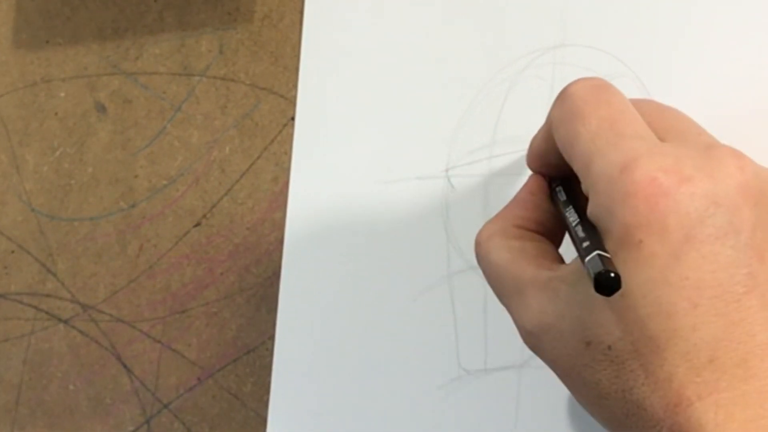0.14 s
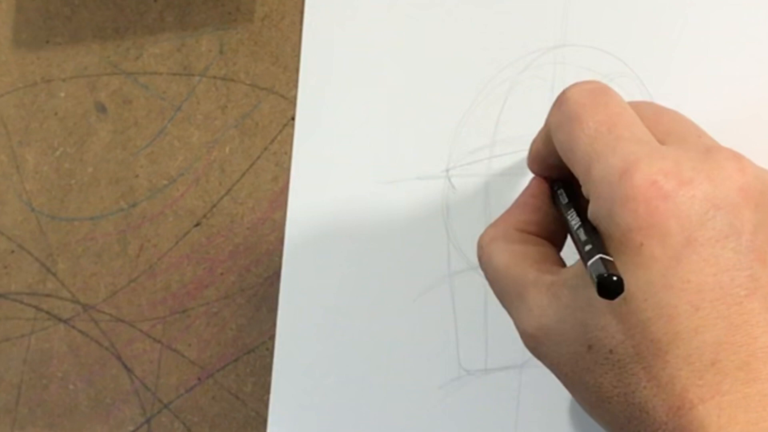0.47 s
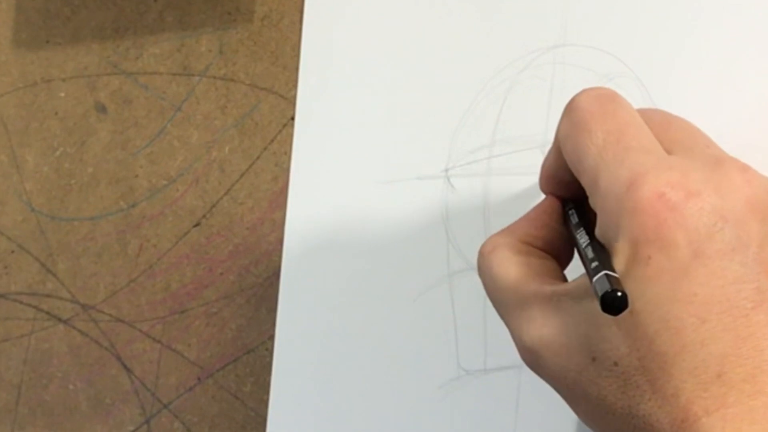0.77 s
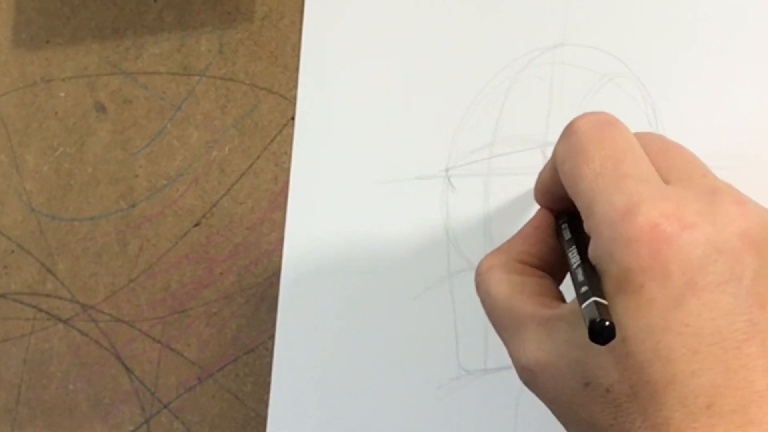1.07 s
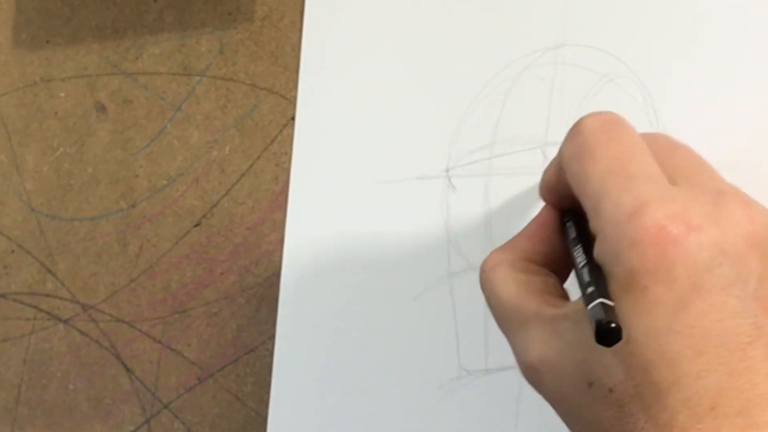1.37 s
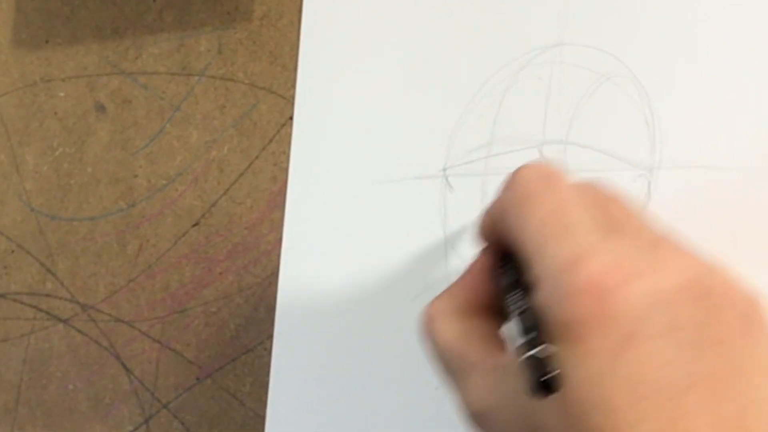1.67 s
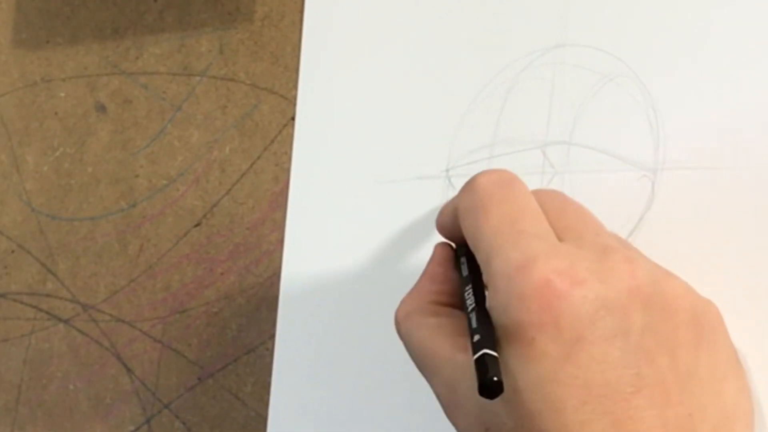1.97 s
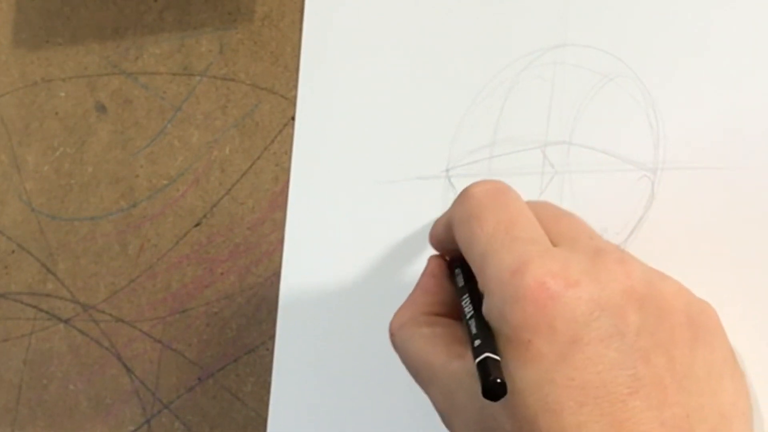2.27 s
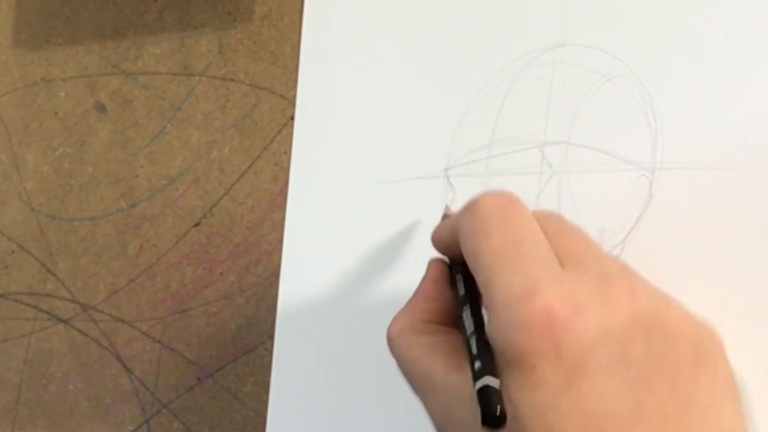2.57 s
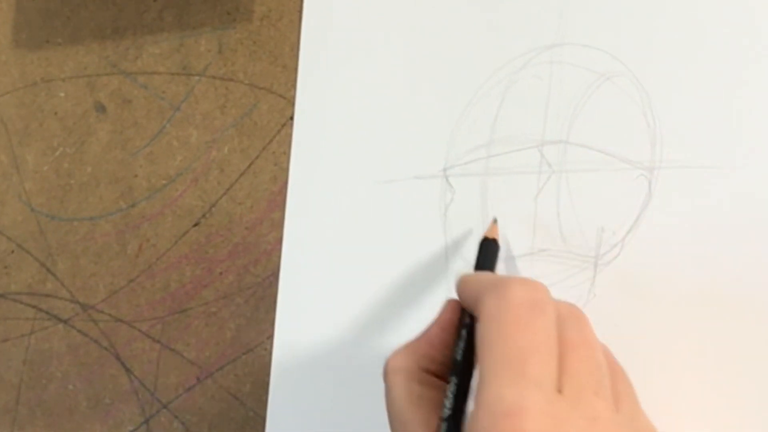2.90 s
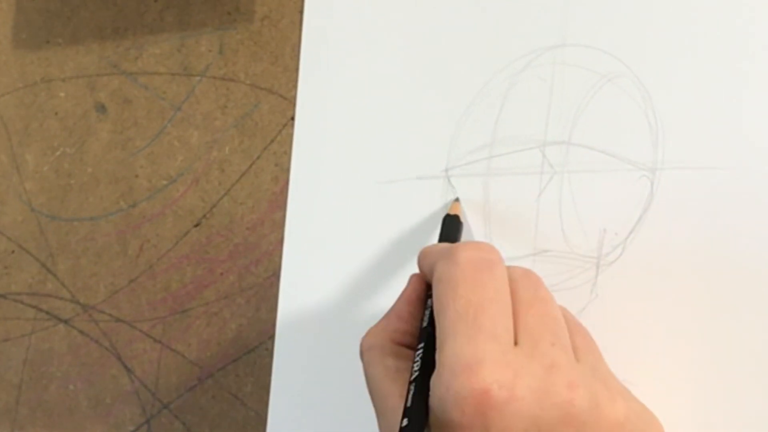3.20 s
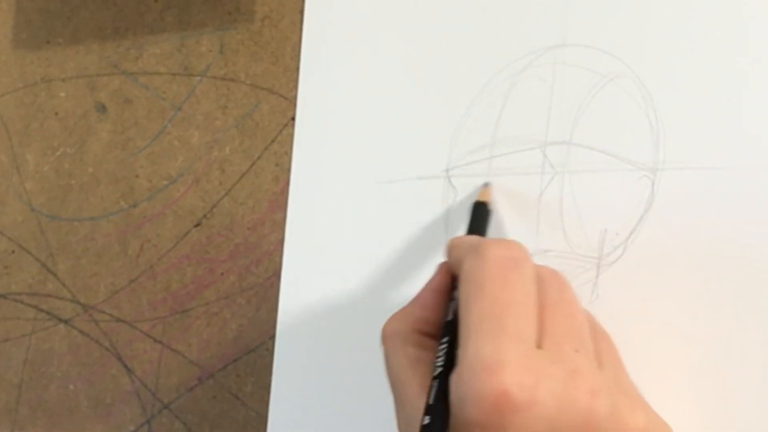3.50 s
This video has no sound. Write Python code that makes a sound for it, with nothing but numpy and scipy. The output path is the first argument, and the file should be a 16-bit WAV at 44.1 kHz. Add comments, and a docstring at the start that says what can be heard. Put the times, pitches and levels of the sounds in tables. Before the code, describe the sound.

A pencil scratches lightly on paper over a wooden board, close up in a quiet, faintly rumbling room. Soft opening strokes end with a bump at 0.6 seconds. Three quick, stronger strokes follow from 1.1 to 1.5, then a hand slides over the sheet. More short strokes come around 2 to 2.4, the hand slides again until 3, and two longer strokes start at 3.3, with occasional tiny ticks.

```python
"""Short, dry pencil strokes on a sheet of paper, close to one microphone in a quiet room.
The lead catches on the paper's tooth: the catches drum on the wooden board under the sheet
and ring the pencil high up. Between groups of strokes the hand slides over the paper.
A few tiny ticks and soft bumps come from the same spot; a low room rumble lies under it all."""
import sys
import numpy as np
from scipy import signal
from scipy.fft import rfft, irfft
from scipy.io import wavfile
from scipy.ndimage import uniform_filter1d

SR = 44100
rng = np.random.default_rng(int(sys.argv[2]) if len(sys.argv) > 2 else 0)


def unload_audio(sound):
    """Save the sound as a 16-bit wav file, at the path given as the first command line argument."""
    columns = np.transpose(np.atleast_2d(sound))
    # keep every value between -1 and 1, then stretch to whole-number steps
    steps = np.round(np.clip(columns, -1, 1) * 32767)
    wavfile.write(sys.argv[1], SR, steps.astype(np.int16))


N = 160965

# Pencil strokes, close up. Each row: start in seconds, length in seconds, fastest point as a share
# of the length, board level in dB, board tilt in dB per octave, pencil level in dB, grip.
PENCIL_STROKES = [ (0.048, 0.28, 0.49, -72, 3.5, -69.5, "damped"),
                  (0.279, 0.22, 0.086, -60.5, -2.5, -69, "damped"),
                  (0.450, 0.21, 0.22, -66.5, 0, -66.5, "damped"), (0.960, 0.17, 0.28, -75, 3, -73, "firm"),
                  (1.079, 0.15, .45, -53, -0.5, -60, "firm"), (1.208, 0.15, 0.28, -53, -1.5, -63.5, "firm"),
                  (1.337, 0.12, 0.41, -55.5, 0, -62.5, "firm"), (1.927, .110, 0.46, -85, -5, -81, "light"),
                  (2.060, 0.14, 0.34, -57.5, -1, -60, "light"), (2.19, 0.11, .55, -62, -1, -66, "light"),
                  (2.307, 0.084, .48, -56, -0.5, -60, "light"),
                  (2.383, 0.06, 0.31, -68.5, -5, -73, "light"), (3.335, 0.19, .38, -52.5, -1, -62, "long"),
                  (3.513, 0.27, 0.21, -60, -6.5, -71, "long"), ]
# Ringing of the pencil in each grip, and of the board under the sheet.
# Each row: frequency in Hz, width in Hz, relative level in dB.
GRIP_MODES = { "damped": [(1216, 180, 9), (3250, 290, -0.5), (9770, 550, 1.5), (13160, 580, 4.5)],
              "firm": [(930, 51, 6.5), (6200, 430, -12), (9450, 200, 2.5), (13150, 770, -5.5)],
              "light": [(596, 47, 3), (1790, 470, -21), (5860, 310, -11), (9370, 230, 7),
              (13060, 540, -1.5)], "long": [(3330, 590, -16), (5900, 240, -6), (9470, 350, 2.5),
              (12900, 750, -7)], }
WOOD_MODES = [(174, 44, -8), (257.6, 30, 2.5), (282, 9.3, -0.5), (440.4, 42, 1), (500, 34, -7),
              (610, 36, 4.5), (679, 31, 3.5), (750, 27, -21), (830, 43, -10.5), (1215, 87, -9),
              (1650, 240, -16), (2050, 220, -19)]
# The hand sliding over the sheet. Each row: start in seconds, length in seconds, fastest point
# as a share of the length, hiss level in dB, rub level in dB, board rumble level in dB.
HAND_SLIDES = [ (0.705, 0.23, 0.78, -67.5, -74.5, -64), (1.421, 0.37, 0.51, -56, -65.5, -52),
               (2.426, 0.39, .28, -58.5, -66.5, -45.5), (2.698, .35, 0.71, -62.5, -75, -57), ]
# Ticks of the pencil and bumps of the hand on the board. Each row: start in seconds, peak in dB.
PENCIL_TICKS = [(1.7779, -52), (3.1014, -54), (3.6167, -51)]
HAND_BUMPS = [(0.626, -48), (0.644, -53.5), (1.473, -50.5)]
# Tone of each sound at the microphone. Each row: frequency in Hz, relative level in dB.
SCRATCH_TONE = [(200, -23), (1000, -3), (1800, 10.5), (2700, 5.5), (4500, -11), (7000, -18), (10500, 5.5),
                (14500, 1), (16000, -14)]  # dry scratch of the lead itself
HISS_TONE = [(500, -14), (2500, -9), (4500, -11), (8000, -10), (9700, -2), (11300, -2.5), (13500, -3.5),
             (15200, -5), (16000, -1.5)]  # fine hiss of skin on paper
RUB_TONE = [(150, -23), (600, -6), (950, -11), (1500, 4.5), (2000, 0), (2700, -8), (3450, -11), (4200, -21),
            (8000, -22), (16000, -38)]  # the duller rub beneath it
TICK_TONE = [(200, -15), (1500, -1), (3500, 4), (7000, -1.5), (11000, -6), (16000, -25)]  # bright tick of the pencil
BUMP_TONE = [(50, -2), (150, -1.5), (260, 3), (400, -22), (800, -19.5), (2000, -35), (16000, -49)]  # soft thud on the board
RUMBLE_TONE = [(1, -14.5), (6, -1), (16, 3.5), (26, -9.5), (40, -16.5), (60, -15), (80, -24.5),
               (130, -41.5), (300, -41.5), (1000, -76)]  # deep rumble of both room and board
ROOM_TONE = [(30, -0.5), (170, 2), (300, -6.5), (600, -7.5), (1100, -10.5), (2000, -16.5), (4000, -19.5),
             (9000, -21), (15500, -22.5)]  # faint hiss of room and microphone

CATCHES_PER_S, CATCH_SPREAD_DB = 9000, 3.5  # lead on paper, near full speed
SKIN_GRAINS_PER_S, SKIN_SPREAD_DB = 25000, 1.5  # skin on paper, near full speed
PRESSURE_DB, PRESSURE_CHANGES_PER_S = 2, 23  # unevenness of the lead's contact
PENCIL_EXPONENT, BOARD_EXPONENT = 1.1, 1.4  # amplitude as a power of the stroke's speed
HISS_EXPONENT, RUB_EXPONENT = 2.0, 2.4  # amplitude as a power of the slide's speed
SPEED_PEAKINESS = 0.44  # 0 = rounded movement, 1 = straight rise and fall
SCRATCH_DB = -12.5  # relative to the pencil's ringing
BOARD_DULL_HZ = 2780  # the wood passes little above this
RUB_LEAD_S = .025  # the dull rub comes a little before the hiss
TOP_HZ = 15650


def pencil_strokes():
    """The lead's catches scratch, ring the pencil as the grip allows, and drum on the board."""
    ring, tip, wood = 0, 0, 0
    pressure = undb(PRESSURE_DB * wander(PRESSURE_CHANGES_PER_S))
    board = resonances(WOOD_MODES) / (1 + (freqs() / BOARD_DULL_HZ) ** 2)
    octaves = np.log2(np.clip(freqs(), 150, 2000))  # the board's tilt acts within this band
    grips = {grip: resonances(modes) for grip, modes in GRIP_MODES.items()}
    for start, length, fastest, board_db, tilt_db, pencil_db, grip in PENCIL_STROKES:
        speed = hand_speed(start, length, fastest)
        force = catches(speed, CATCHES_PER_S, CATCH_SPREAD_DB) * pressure
        drive = force * speed ** PENCIL_EXPONENT * undb(pencil_db)
        ring += shaped(drive, grips[grip])
        tip += drive
        tilted_board = board * undb(tilt_db * octaves)
        wood += undb(board_db) * shaped(force * speed ** BOARD_EXPONENT, tilted_board)
    scratch = undb(SCRATCH_DB) * shaped(tip, colour(SCRATCH_TONE))
    return ring + wood + scratch


def catches(speed, per_s, spread_db):
    """Random tiny catches on the paper's tooth, denser at speed; power near 1."""
    chance = np.clip(per_s * (speed + .1) / SR, 1e-4, 1)
    size = undb(spread_db * np.minimum(rng.exponential(size=N), 4))
    caught = rng.random(N) < chance
    return caught * np.sign(noise()) * size / np.sqrt(chance * np.mean(size ** 2))


def hand_speed(start, length, fastest):
    """The hand speeds up from rest, peaks at 1 and slows to rest."""
    times = start + length * np.array([0, fastest, 1])
    ramp = np.interp(np.arange(N) / SR, times, [0, 1, 0])
    return SPEED_PEAKINESS * ramp + (1 - SPEED_PEAKINESS) * np.sin(np.pi / 2 * ramp)


def hand_slides():
    """Skin slides over paper: a fine hiss, a duller rub, and a deep rumble as the arm shifts."""
    hiss, rub, rumble = 0, 0, 0
    for start, length, fastest, hiss_db, rub_db, rumble_db in HAND_SLIDES:
        speed = hand_speed(start, length, fastest)
        early_speed = hand_speed(start - RUB_LEAD_S, length, fastest)
        grains = catches(speed, SKIN_GRAINS_PER_S, SKIN_SPREAD_DB)
        hiss += grains * speed ** HISS_EXPONENT * undb(hiss_db)
        rub += noise() * early_speed ** RUB_EXPONENT * undb(rub_db)
        rumble += noise() * early_speed * undb(rumble_db)
    skin = shaped(hiss, colour(HISS_TONE)) + shaped(rub, colour(RUB_TONE))
    return skin + shaped(rumble, colour(RUMBLE_TONE))


def touches(events, tone, decay_s):
    """Brief contacts of pencil or hand: bursts of noise that die away at once."""
    contacts, t = 0, np.arange(N) / SR
    for start, peak_db in events:
        envelope = (t >= start) * np.exp(-np.abs(t - start) / decay_s)
        burst = shaped(noise() * envelope, colour(tone))
        contacts += burst * undb(peak_db) / np.abs(burst).max()
    return contacts


def room(rumble_db, hiss_db):
    """The quiet room behind the board: deep rumble and a faint, even microphone hiss."""
    rumble = undb(rumble_db) * shaped(noise(), colour(RUMBLE_TONE))
    hiss = undb(hiss_db) * shaped(noise(), colour(ROOM_TONE))
    return rumble + hiss


def undb(db):
    """Decibels to gain."""
    return 10 ** (np.asarray(db) / 20)


def freqs():
    """Frequencies of the spectrum's bins in Hz, kept above zero."""
    return np.maximum(np.arange(N // 2 + 1) * SR / N, 1e-3)


def colour(points):
    """Gain per bin through (Hz, dB) points."""
    hz, db = np.array(points, float).T
    return undb(np.interp(np.log(freqs()), np.log(hz), db))


def resonances(modes):
    """Gain per bin of (Hz, width Hz, dB) resonances, added in power."""
    f = freqs()
    powers = (undb(2 * db) / (1 + ((f * f - hz * hz) / (f * width)) ** 2) for hz, width, db in modes)
    return np.sqrt(sum(powers))


def shaped(x, gain):
    """Filter that keeps the power of a white input."""
    return irfft(rfft(x) * gain / np.sqrt(np.mean(gain ** 2)), N)


def noise():
    """White noise of power 1."""
    return rng.standard_normal(N)


def wander(changes_per_s):
    """Smooth random drift with a spread of 1."""
    window = int(SR / changes_per_s)
    drift = uniform_filter1d(uniform_filter1d(noise(), window), window)
    return drift / drift.std()


def scene():
    """One microphone close to the sheet: both channels carry the same sound."""
    mono = pencil_strokes() + hand_slides()
    mono += touches(PENCIL_TICKS, TICK_TONE, decay_s=.0006)
    mono += touches(HAND_BUMPS, BUMP_TONE, decay_s=.014)
    mono += room(rumble_db=-50, hiss_db=-65)
    return np.array([mono, mono])


def record(dry):
    """The recorder cuts the highest treble steeply."""
    return signal.sosfilt(signal.ellip(10, .2, 70, TOP_HZ, fs=SR, output="sos"), dry)


dry = scene()
out = record(dry)
unload_audio(out)
```